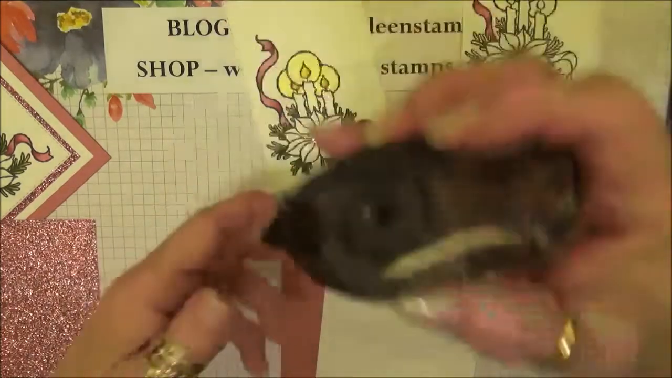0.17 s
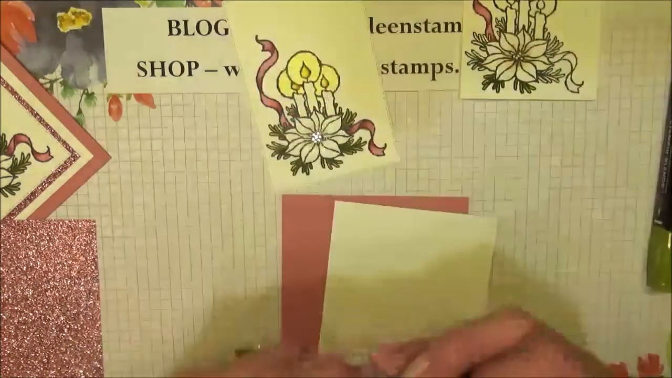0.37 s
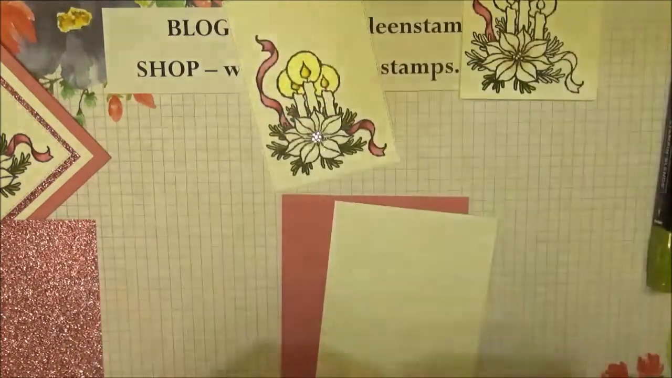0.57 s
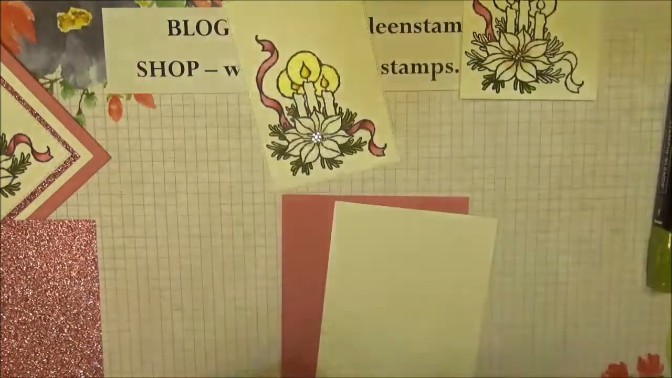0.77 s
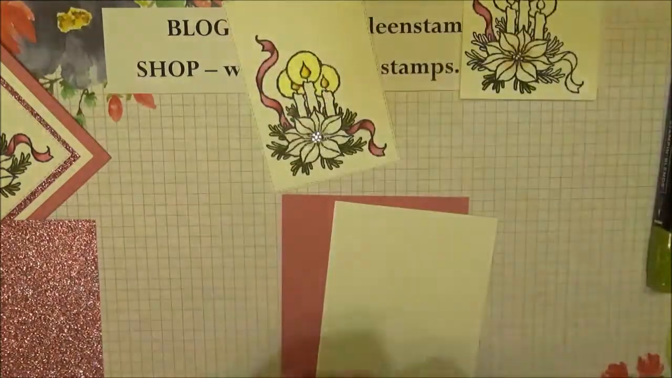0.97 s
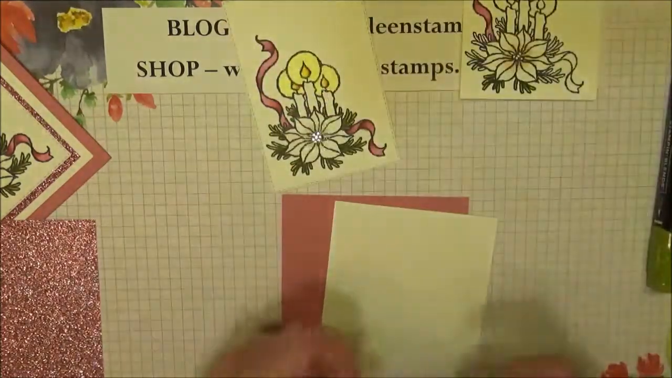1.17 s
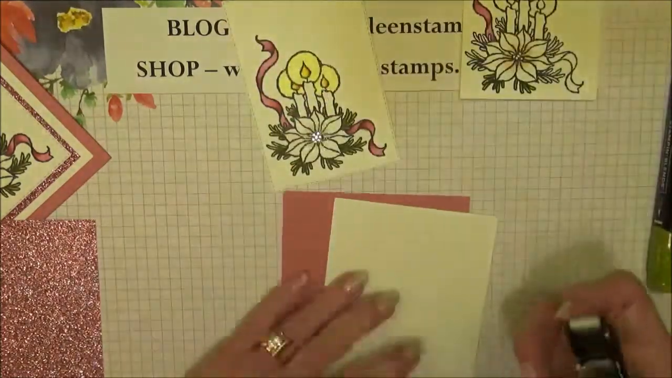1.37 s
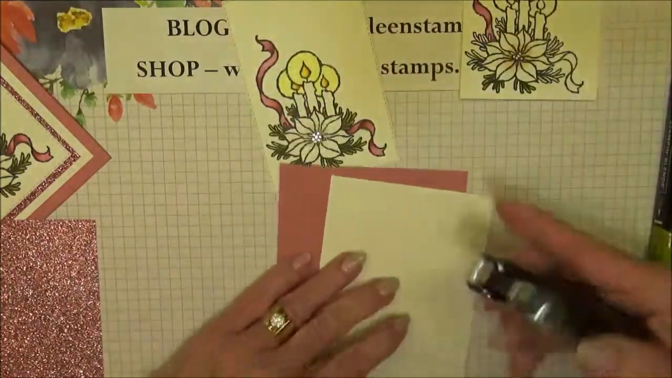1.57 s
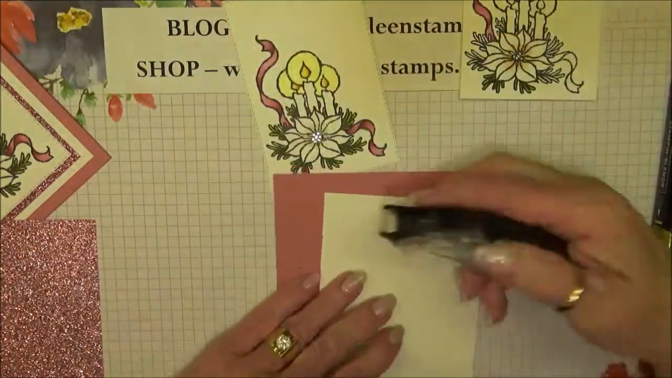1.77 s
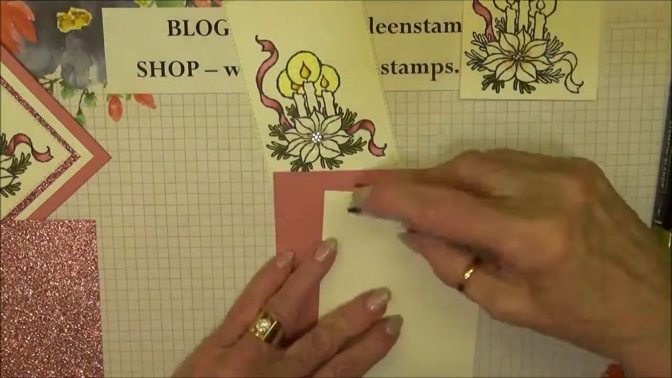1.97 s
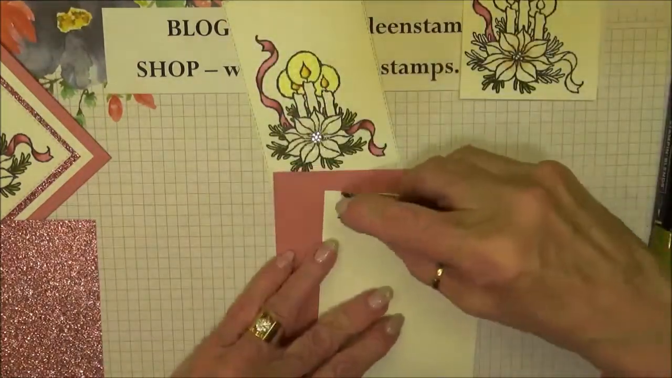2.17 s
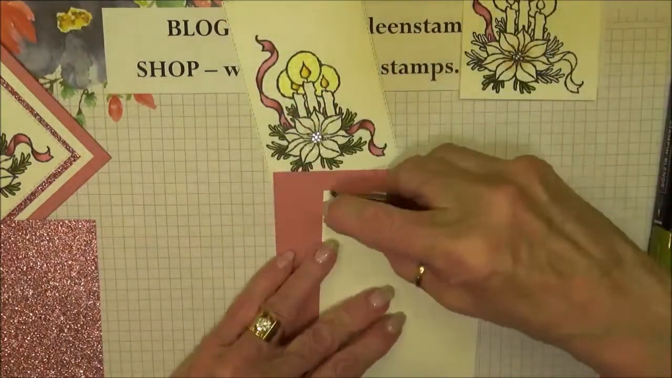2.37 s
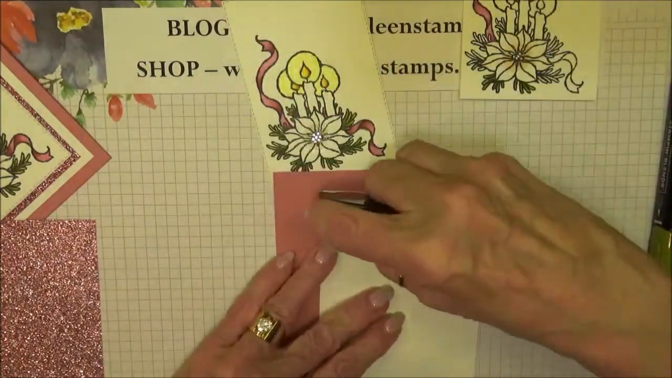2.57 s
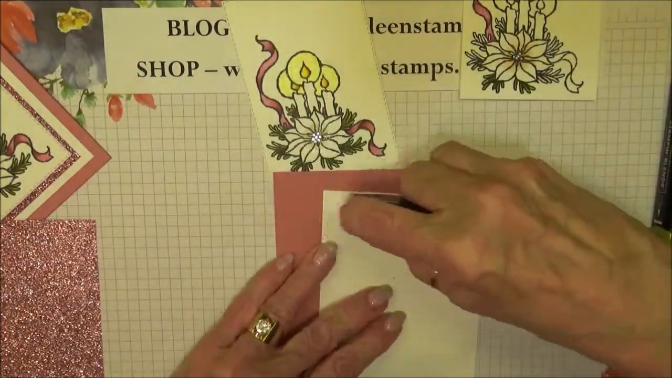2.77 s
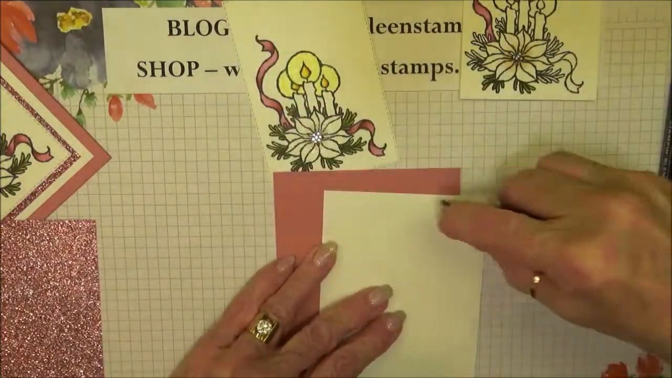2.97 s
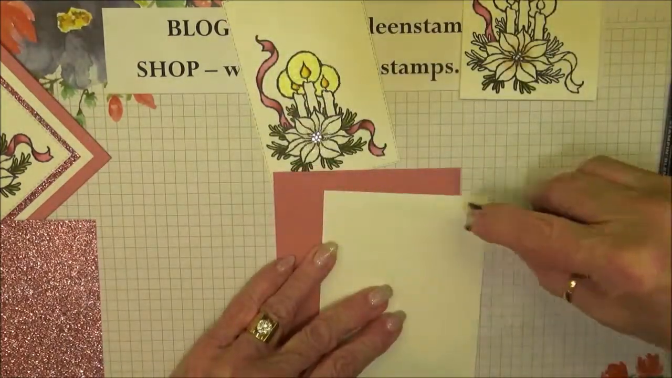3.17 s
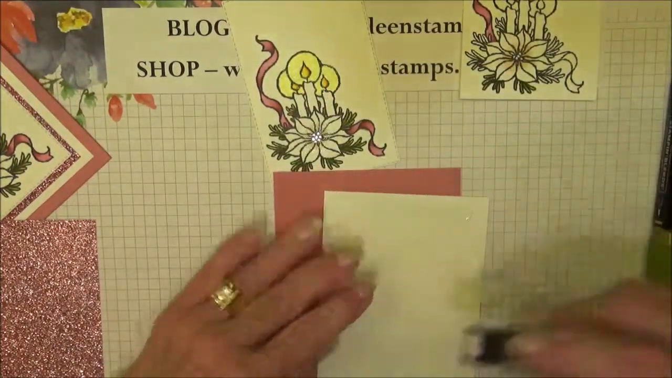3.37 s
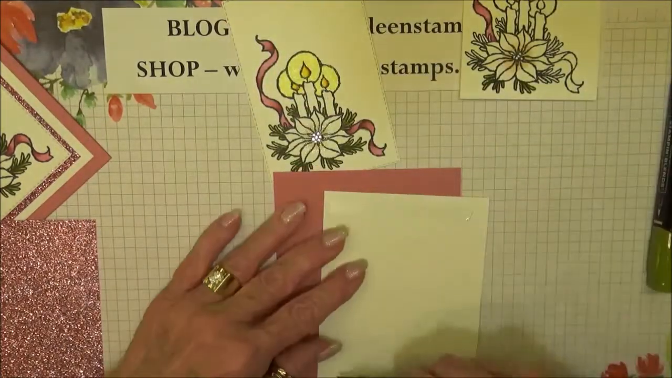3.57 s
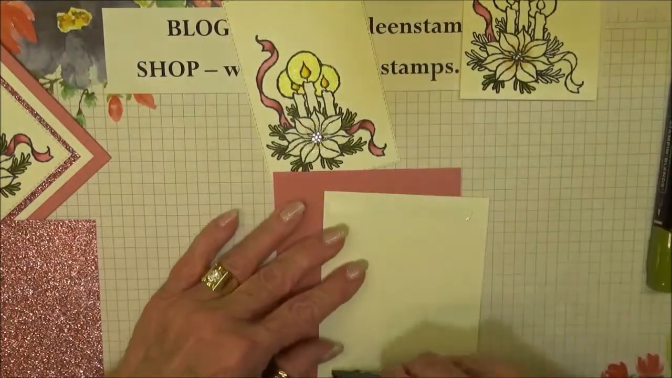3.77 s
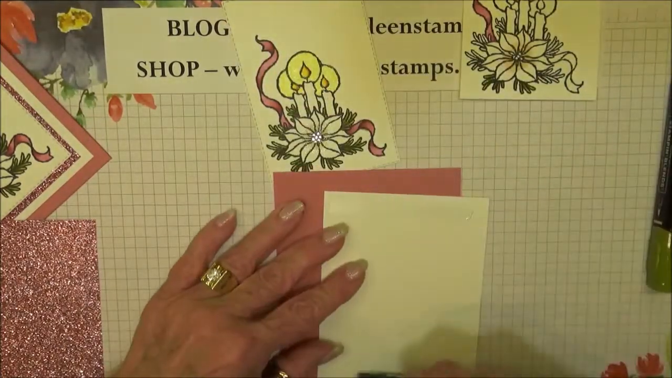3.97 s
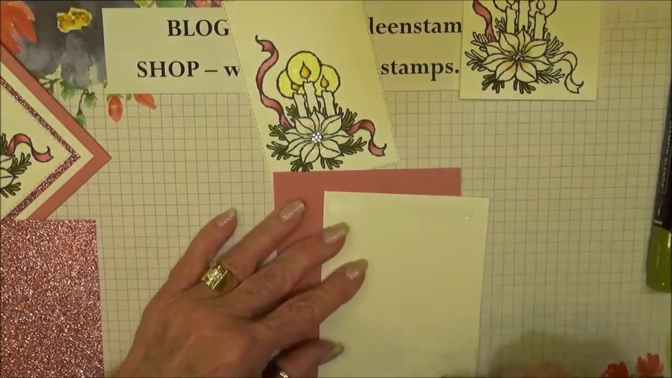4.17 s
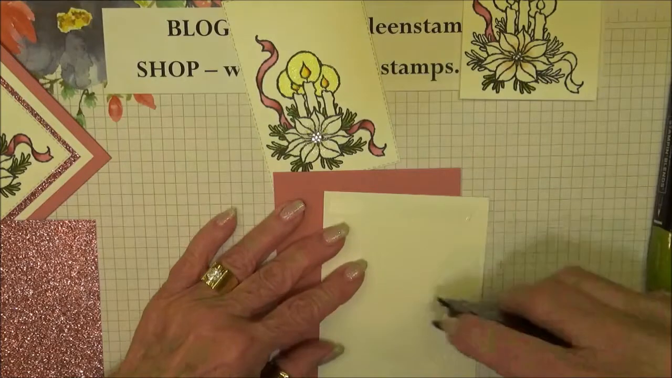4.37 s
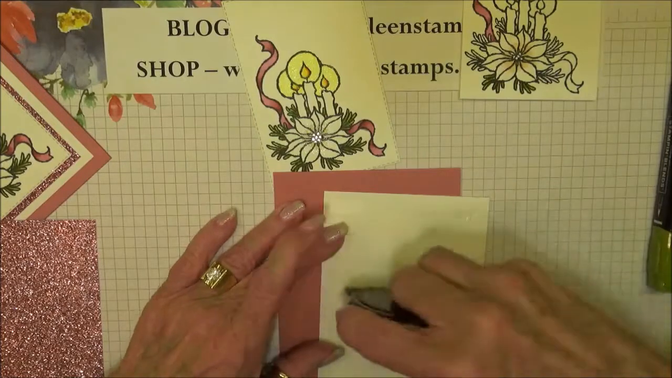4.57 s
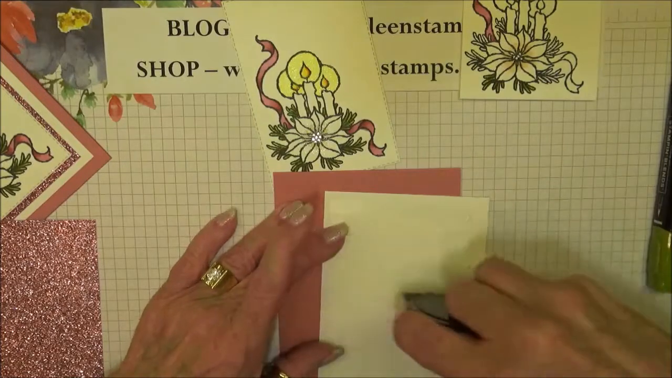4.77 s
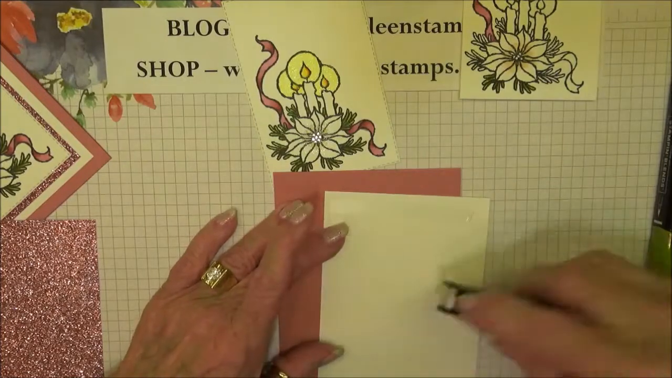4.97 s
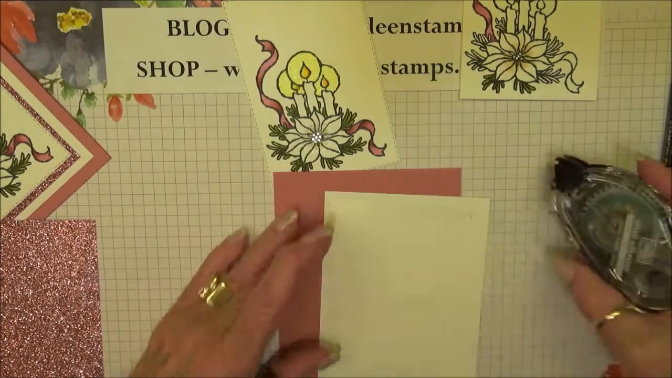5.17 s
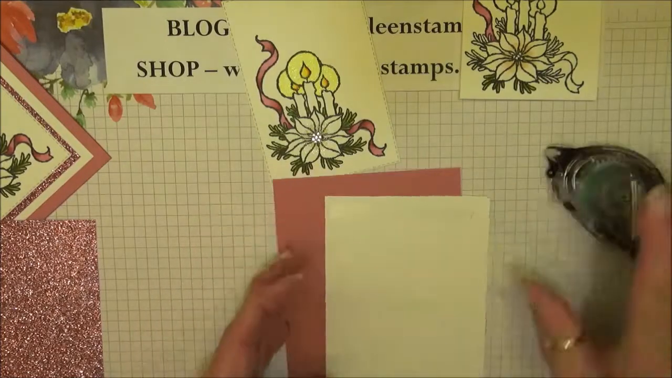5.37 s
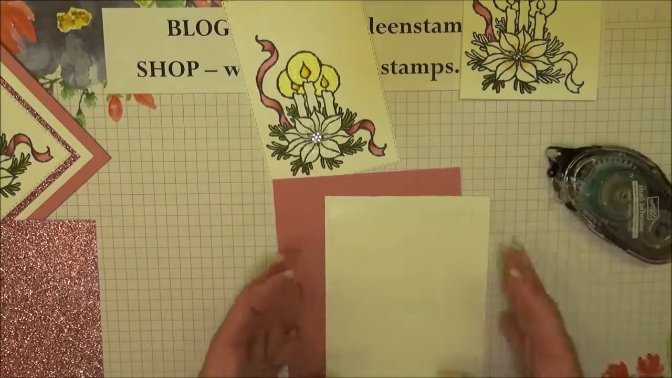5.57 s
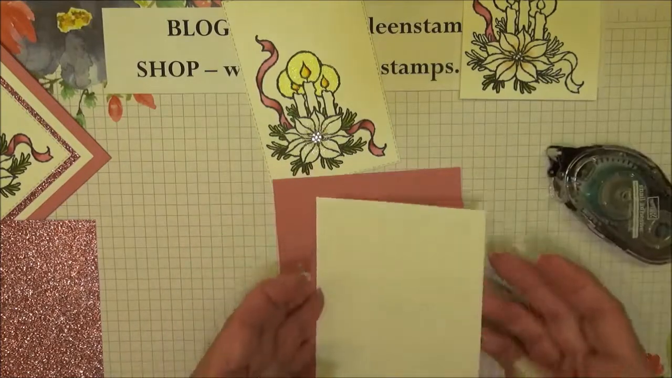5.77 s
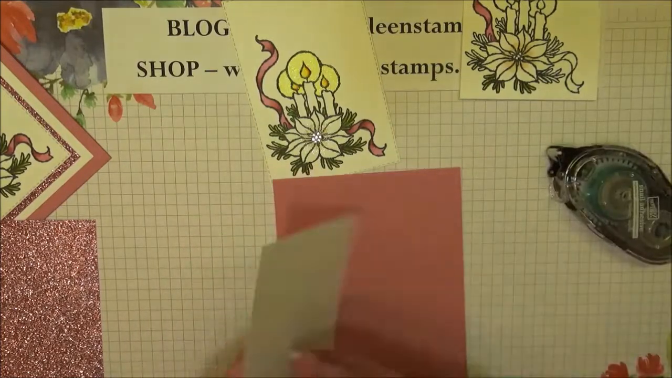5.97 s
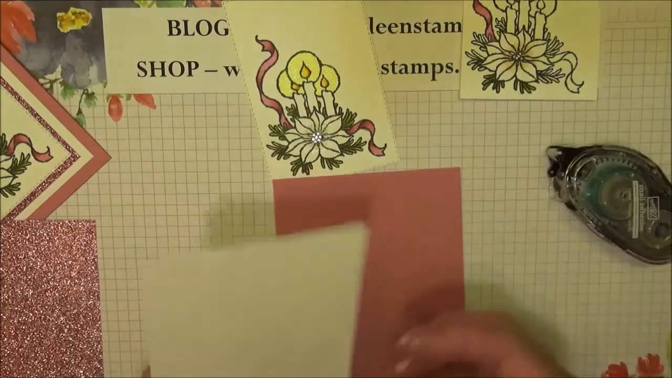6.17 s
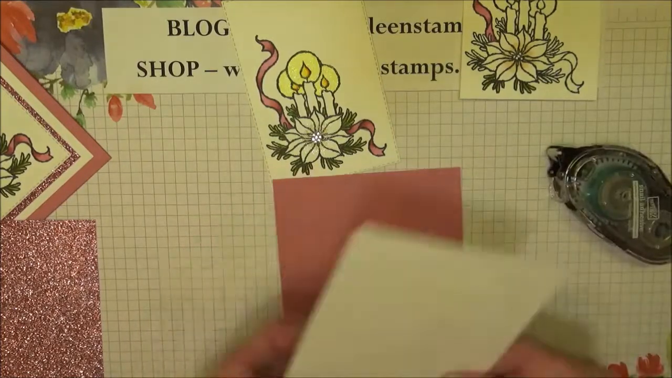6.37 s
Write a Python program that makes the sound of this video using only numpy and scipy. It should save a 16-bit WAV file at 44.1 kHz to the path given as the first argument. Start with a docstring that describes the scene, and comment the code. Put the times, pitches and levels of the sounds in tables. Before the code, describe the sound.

Light plastic clicks and card rustle, three zippy stick-slip tape pulls, then a busy clatter as the dispenser is set down and card lifted.

```python
"""Tape runner at a desk

Adhesive tape is pulled three times: stick-slip tearing crackles through the casing and rumbles in the desk.
Casing and card click as struck resonators, narrow-band noise gives a faint whistle and creaks, and
fingers rustle as grainy friction noise.
The runner is laid down with clicks and soft thuds, impacts that ring the desk top.
A short diffuse reverberation and a quiet, humming noise floor surround the hands; the treble ends steeply.
"""
import sys
import numpy as np
from scipy import signal
from scipy.fft import rfft, irfft, next_fast_len
from scipy.io import wavfile
from scipy.ndimage import uniform_filter1d, map_coordinates

SR = 44100
rng = np.random.default_rng(int(sys.argv[2]) if len(sys.argv) > 2 else 0)


def generate_wav(sig):
    """Save sig (samples, or channels by samples) to the path in sys.argv[1] as 16-bit PCM at SR."""
    pcm = np.round(np.clip(np.atleast_2d(sig).T, -1, 1) * 32767).astype(np.int16)
    wavfile.write(sys.argv[1], SR, pcm)


N = 282989

# Progress of the tape, one list per pull. Each row: time in seconds, slips let go so far, slip level in dB.
PULL_PROGRESS = [
    [(2.652, 0, -38.5), (2.666, 1, -34), (2.674, 2, -23.5), (2.724, 6, -23), (2.7524, 8, -22),
     (2.92, 27, -24), (2.965, 31, -24), (3.002, 33, -23), (3.048, 35, -21.5), (3.062, 36, -23.5),
     (3.085, 37, -25.5), (3.1324, 38, -27)],
    [(3.893, 0, -23.5), (3.905, 1, -23), (4.0547, 22, -23), (4.0656, 23, -23), (4.0878, 24, -23)],
    [(4.688, 0, -22), (4.748, 9.5, -23), (4.7704, 11, -26), (4.801, 12, -25)],
]
# Desk rumble under each pull. Each entry: level relative to the tearing force in dB.
DESK_RUMBLE_DB = [-35, -35, -36]
# Casing colour, flat on the card in the first pull. Each row: frequency in Hz, relative density in dB per Hz.
CASING_FLAT = [(260, -76), (450, -42), (508, -26), (709, -32.5), (927, -16), (1120, -18), (1230, -4.5),
               (1440, -7), (1710, 0.5), (1930, -7.5), (3820, -5.5), (5060, -8), (5710, -14), (7670, -4),
               (11000, -15.5), (14300, -30), (22000, -120)]
# Casing colour, gripped tighter in later pulls. Each row: frequency in Hz, relative density in dB per Hz.
CASING_GRIPPED = [(260, -72), (450, -33), (738, -27), (1090, -27), (1230, -12), (1540, -1.5), (2120, -15.5),
                  (2740, -7.5), (3210, -7), (3620, -12.5), (5000, -7), (6030, -11.5), (7670, -7.5),
                  (8880, -10.5), (11000, -20), (14300, -29), (22000, -120)]
TEAR_SHARE, TEAR_MOST_S = 0.44, 0.0051  # a slip tears for this share of the gap to the next, at most this long


def pulls():
    """Stick-slip: each slip tears adhesive for a few ms, driving the casing's colour and the desk's modes."""
    t = np.arange(SR // 10) / SR
    late_threads = 0.04 * amp(-60 * t / 0.4)  # threads part late

    def slip(hold):
        onset = 1 - np.exp(-t / 0.00064)
        return onset * (amp(-60 * np.maximum(t - hold, 0) / 0.024) + late_threads)

    power = np.zeros((len(PULL_PROGRESS), N))
    for track, pull in zip(power, PULL_PROGRESS):
        s, drawn, db = np.transpose(pull)
        times = np.interp(np.arange(round(drawn[-1]) + 1), drawn, s)
        holds = np.minimum(TEAR_SHARE * np.gradient(times), TEAR_MOST_S)
        for at, hold, (shift, size) in zip(times, holds, rng.standard_normal((50, 2))):
            gain = amp(np.interp(at, s, db) + 0.5 * size)
            add(track, at + 0.00045 * shift, (gain * slip(hold)) ** 2)  # powers of overlapping slips add
    force = np.sqrt(power) * patchy(crackle(spiky_db=3.0), depth_db=2)
    rumble = ringing(amp(DESK_RUMBLE_DB) @ force, desk_modes)
    first = filtered(force[0], causal(CASING_FLAT))
    later = filtered(force[1] + force[2], causal(CASING_GRIPPED))
    return first + later + rumble


# Faint narrow whistle and creaks. Each row: start in seconds, end in seconds, level in dB,
# unsteadiness in dB, ring frequency in Hz, ring width in Hz before squaring.
NARROW_RINGS = [(3.18, 3.518, -64.5, 2, 1940, 130), (3.815, 3.9, -57.5, 4, 1520, 320),
                (4.567, 4.7, -56, 7.5, 1535, 320), (4.812, 4.86, -61, 5.5, 1535, 320)]


def whistle_and_creaks():
    """Resonance of noise: narrow rings, one near 1.9 kHz and three near 1.5 kHz, sounding unsteadily."""
    level, fits = np.zeros((len(NARROW_RINGS), N)), wobble(90)
    for track, (start, end, db, unsteady_db, *_) in zip(level, NARROW_RINGS):
        add(track, start, amp(db) * signal.windows.tukey(round((end - start) * SR), 0.2))
        track *= amp(unsteady_db * fits)

    def rings(hz):
        return np.array([resonant([(*row[4:], 0)], hz) ** 2 for row in NARROW_RINGS])

    return ringing(level * crackle(spiky_db=3.5), rings).sum(axis=0)


# Clicks of casing and card. Each row: time in seconds, strength in dB, relative treble in dB,
# relative body in dB.
CLICK_EVENTS = [(0.0864, -31.5, -24, -8.5), (0.203, -39, -11, -24), (0.2555, -61.5, 14, -14),
                (0.314, -39, -10, -9), (0.318, -26, -10.5, -9.5), (0.3292, -26.5, -32, -29),
                (0.382, -32.5, -11.5, -29), (0.5187, -32, -9.5, -19.5), (0.5305, -30.5, -24, -17),
                (0.5441, -39.5, -15, -21), (0.5686, -46, -5, -18), (0.597, -50, 0, -13),
                (0.627, -48, -17, -20), (0.675, -44.5, -4.5, -32), (0.718, -45.5, 4.5, -26),
                (0.7437, -36.5, -22, -23), (0.7663, -37, 0, -19.5), (0.7876, -37, -11, -40),
                (0.8132, -46.5, 8, -20), (0.8213, -44, -4, -25), (0.896, -46.5, -8, -25),
                (0.9444, -23.5, 0.5, -22.5), (0.9994, -22, -10, -20.5), (1.055, -43, -12, -13),
                (1.1838, -27, -1, -17.5), (1.28, -44, -1, -11), (1.3349, -37, -3, -7.5),
                (1.3748, -53, 7, -17), (1.4109, -38, -2, -11), (1.4428, -39.5, 1, 0), (1.552, -45, -6, 0),
                (1.6618, -37, -18, -15.5), (1.7828, -42.5, -9, -19), (1.8062, -41, -26, -9.5),
                (1.8863, -40.5, 8.5, -2), (2.2669, -46, -8.5, -7), (2.4143, -43, -4.5, -7.5),
                (2.449, -46.5, -7, -9), (2.495, -49.5, -0.5, -9), (2.5682, -21.5, -14, -22),
                (2.585, -40.5, -3, -6.5), (3.109, -35, 3, -17), (3.116, -43, 10, -17),
                (3.1208, -36.5, 11, -34), (3.1997, -27.5, -2, -21), (3.4715, -32, -3, -5),
                (3.662, -41, -8, -9), (3.8531, -40.5, -12, -21), (4.1492, -41, 2.5, -19),
                (4.218, -39.5, -11, -23), (4.231, -31, -3, -11.5), (4.2412, -38.5, 4.5, -27),
                (4.2712, -34, -6, -19), (4.2798, -25, -13.5, -37), (4.335, -36, -15, -20),
                (4.5348, -25.5, -7, -27), (4.5461, -22, -10, -18.5), (4.8674, -31, 1, -5.5),
                (4.9147, -43.5, 8, -17), (4.9597, -40, -8, -23), (5.1671, -29, 2.5, -32),
                (5.1946, -24, -3, -11), (5.1797, -32, -10, -14), (5.2827, -18.5, -7.5, -15.5),
                (5.2904, -18, -7, -21), (5.3676, -18, -8, -15), (5.3861, -23, -9.5, -38),
                (5.397, -27, -9, -27), (5.4213, -20.5, -13, -38), (5.447, -19.5, -8.5, -15),
                (5.474, -20, -20, -16), (5.4962, -26, -5, -26), (5.6168, -30.5, -15, -21),
                (5.646, -26.5, -16, -19), (5.8011, -23, -3.5, -15), (5.8334, -33, -2, -11),
                (5.848, -32.5, -3, -15), (5.9073, -33.5, -3.5, -15), (5.9292, -32.5, -0.5, -2.5),
                (5.9442, -39, -3, -3.5), (6.068, -49, -20, 4), (6.1817, -36.5, -7.5, -11.5),
                (6.2219, -28.5, -5, -8), (6.232, -31, 1, -3.5), (6.2401, -33, 0, -7.5),
                (6.2566, -30.5, -4, -4.5)]
# Low resonances. Each row: frequency in Hz, width in Hz before broadening, relative level through
# the casing in dB, relative level through card and desk in dB.
BODY_MODES = [(532, 370, -12.5, -1), (956, 215, -5.5, -2), (1212, 98, -2.5, -5.5)]
# Upper casing resonances. Each row: frequency in Hz, width in Hz before broadening, relative level in dB.
CASING_MODES = [(2304, 1160, -4.5), (2990, 1310, -1), (4960, 1270, -4), (6200, 400, -9), (7640, 1540, -2.5),
                (8900, 1050, -3.5), (10550, 3400, -10.5)]
# Narrow rings of the casing held free in the air. Each row: frequency in Hz, width in Hz before
# broadening, relative level in dB.
SHELL_MODES = [(1770, 100, -19), (3495, 170, -12.5), (5230, 150, -13.5)]
HELD_FREE_FROM_S, HELD_FREE_TO_S = 0.45, 1.1
CARD_FROM_S = 5.44  # later clicks come through card and desk
CLICK_T60_S, LONGER_PER_DB = 0.028, 0.0258  # burst decay at -34 dB, log growth for each dB louder
FIRST_BLOW = 7.23  # first sample, against a burst of rms 1 before its decay


def clicks():
    """Impulse response: a blow and a short burst ring body, middle and treble modes at chance strengths."""
    upper, rows = [(1701, 330, 0.2)] + CASING_MODES, CLICK_EVENTS + ticks()
    modes = BODY_MODES + upper + SHELL_MODES
    t, hits = np.arange(SR // 10) / SR, np.zeros((len(modes), N))
    grit = np.pad(crackle(spiky_db=1), (0, SR))
    for (s, db, treble_db, body_db), chance in zip(rows, rng.standard_normal((len(rows), len(hits)))):
        t60 = CLICK_T60_S * np.exp(LONGER_PER_DB * (db + 34))
        burst = amp(-60 * t / t60) * grit[round(s * SR):][:len(t)]
        burst[0] = FIRST_BLOW
        levels = [body_db - 0.5 + (card_db if s > CARD_FROM_S else casing_db)
                  for _, _, casing_db, card_db in BODY_MODES]
        levels += [mode_db + (-8 if hz < 4000 else treble_db - 2.0) for hz, _, mode_db in upper]
        if HELD_FREE_FROM_S < s < HELD_FREE_TO_S:
            levels += [mode_db for _, _, mode_db in SHELL_MODES]
        for track, level_db, c in zip(hits, levels, chance):
            add(track, s, amp(db + level_db + 2.14 * c) * burst)

    def squared_modes(hz):  # squaring steepens the skirts; broader single modes make up for the narrowing
        return np.array([(-1) ** k * resonant([(centre, 1.69 * width, 0)], hz) ** 2
                         for k, (centre, width, *_) in enumerate(modes)])

    return ringing(hits, squared_modes).sum(axis=0)


TICKS_A_SECOND = 4  # faint chance ticks under sliding fingers
TICK_DB, TICK_TREBLE_DB, TICK_BODY_DB = 12, -2, -25  # strength over the steady hiss, relative colour


def ticks():
    """Random point process: click rows at chance times, their strength following the sliding."""
    s = rng.uniform(0, N / SR, int(TICKS_A_SECOND * N / SR))
    db = np.interp(s, *np.transpose(SLIDING)[:2]) + TICK_DB
    return [(at, level, TICK_TREBLE_DB, TICK_BODY_DB) for at, level in zip(s, db)]


# Knocks on the desk. Each row: time in seconds, strength in dB, relative deep thump in dB.
DESK_KNOCKS = [(1.282, -50.5, 0), (2.567, -40.5, -21), (3.129, -61, -9), (3.466, -52.5, -11),
               (4.526, -49.5, -16), (4.693, -47, -20), (5.178, -41.5, -14), (5.291, -24, -31),
               (5.37, -43, -7), (5.457, -29, -33), (5.549, -38.5, -22), (5.639, -41, -29), (5.8, -47, -24),
               (5.906, -41, -23), (6.228, -44, -23)]


def thuds():
    """Soft impact: slow-rising pushes and a shaking tail ring the desk, with a decaying deep sine below."""
    t, pushes, deep = np.arange(SR // 4) / SR, np.zeros(N), np.zeros(N)
    for (s, db, deep_db), grit in zip(DESK_KNOCKS, rng.standard_normal((len(DESK_KNOCKS), len(t)))):
        shaking = 1.1 * amp(-60 * t / 0.17) * grit
        push = (amp(-60 * t / 0.0043) + shaking) * (1 - np.exp(-t / 0.0012))
        add(pushes, s, amp(db + 7.5) * push)
        thump = amp(-60 * t / 0.18) * (1 - np.exp(-t / 0.0032)) * np.sin(2 * np.pi * 66 * t)
        add(deep, s, amp(db + deep_db + 11.0) * thump)
    return deep + amp(-11.5) * ringing(pushes, lambda hz: desk_modes(hz) / (1 + 1j * hz / 700))


# Resonances of the desk top. Each row: frequency in Hz, width in Hz, relative level in dB.
DESK_MODES = [(99, 26, 0), (201, 25.3, 4), (342, 12.6, 3), (486, 19, -15), (575, 19, -4.5)]


def desk_modes(hz):
    """Modal superposition: the desk top answers as a sum of resonances."""
    return resonant(DESK_MODES, hz)


# Steady sliding of skin and card. Each row: time in seconds, hiss level in dB, card body level in dB.
SLIDING = [(0, -59.5, -63.5), (.86, -62.5, -65.5), (1.5, -54.5, -64.5), (1.93, -55, -59.5),
           (1.98, -71, -71.5), (2.55, -69, -65.5), (3.15, -59, -56.5), (3.45, -62, -63), (3.68, -72.5, -68),
           (4.1, -57.5, -62), (4.33, -65, -57), (4.36, -70, -68.5), (4.85, -55.5, -61), (5.1, -60, -67.5),
           (5.45, -50, -45.5), (5.68, -62, -62), (5.8, -47.5, -50.5), (6.42, -61, -67)]
# Short swells of scraping, with one slip-like swell near 4.53 s. Each row: start in seconds,
# end in seconds, hiss in dB, card body in dB.
SHORT_SWELLS = [(0.043, 0.084, -61, -78), (0.408, 0.447, -60, -65), (0.491, 0.566, -56, -83),
                (0.713, 0.823, -62, -64), (0.952, 1.009, -44.5, -61), (1.312, 1.477, -48, -67),
                (2.027, 2.07, -62, -73), (4.154, 4.166, -46, -60), (4.446, 4.467, -50.5, -55.5),
                (4.53, 4.549, -40, -50.5), (5.161, 5.193, -39.5, -49), (5.49, 5.6, -50, -50.5),
                (5.779, 5.843, -42.5, -45.5), (5.892, 5.973, -46, -42.5), (5.955, 6.069, -50.5, -50),
                (6.097, 6.158, -53, -57.5), (6.26, 6.357, -49.5, -54)]
# Colour of the skin's hiss. Each row: frequency in Hz, relative density in dB per Hz.
SKIN_COLOUR = [(880, -52), (1500, -31), (2080, -6), (2390, -33), (2580, -3.5), (5650, -3), (7750, 1.5),
               (11000, -6), (14300, -21), (22000, -120)]
# Colour of the card's body. Each row: frequency in Hz, relative density in dB per Hz.
CARD_COLOUR = [(120, 2.5), (200, -3.5), (463, -8), (696, -3), (815, -5.5), (1230, -1.5), (3000, -8),
               (3900, -13), (6600, -120)]


def rustle():
    """Friction noise: sliding skin hisses in clumps of grains and the card drones under it."""
    levels = amp(curves(SLIDING))
    for start, end, hiss_db, body_db in SHORT_SWELLS:
        swell = signal.windows.tukey(round((end - start) * SR), 0.5)
        add(levels[0], start, amp(hiss_db) * swell)
        add(levels[1], start, amp(body_db) * swell)
    clumps = 1.4 * wobble(70) + 2.2 * wobble(200)  # dB

    def card_gain(hz):
        return amp(along(CARD_COLOUR, hz)) * hz ** 2 / (hz ** 2 + 130 ** 2)

    hiss = filtered(crackle(spiky_db=-1), lambda hz: amp(along(SKIN_COLOUR, hz)))
    body = filtered(crackle(spiky_db=3), card_gain)
    hiss = unit(amp(clumps) * hiss)
    body = unit(amp(0.7 * clumps + 3.45 * wobble(40)) * body)
    return levels[0] * hiss + levels[1] * body


# Reverberation. Each row: frequency in Hz, time to fall by 60 dB in seconds.
ROOM_DECAY = [(200, 0.35), (2000, 0.16), (10000, 0.12)]


def room(x):
    """Diffuse reverberation: a noise tail, in which each frequency dies at its own speed, answers x."""
    hz, t, z = signal.stft(rng.standard_normal((2, SR // 2)), SR, nperseg=256)
    decay = amp(-60 * t / along(ROOM_DECAY, hz)[:, None])
    tail = signal.istft(z * decay, SR, nperseg=256)[1]
    delayed = np.pad(x, (130, 0))[None]
    return signal.fftconvolve(delayed, tail / np.linalg.norm(tail[0]), axes=1)[:, :N]


# Room and microphone noise. Each row: frequency in Hz, relative density in dB per Hz.
AIR_COLOUR = [(12, -29), (20, 3.5), (59, -8), (124, -2), (184, -8.5), (199, -14), (346, -16.5), (652, -58),
              (969, -44), (11000, -57), (14300, -65), (22000, -120)]
# Hum lines. Each row: frequency in Hz, relative level in dB.
HUM_LINES = [(26.9, -75), (91.5, -75), (118.4, -63.5), (172.3, -76), (339.1, -80)]


def background():
    """Stationary noise floor: nearly mono coloured noise and slightly unsteady sine lines."""
    mid, side = filtered(rng.standard_normal((2, N)), lambda hz: amp(along(AIR_COLOUR, hz)))
    air = amp(-64) * unit(np.array([mid + 0.067 * side, mid - 0.2 * side]))
    t, hum = np.arange(N) / SR, np.zeros(N)
    for hz, db in HUM_LINES:
        hum += amp(db + 1.5 + 0.77 * wobble(2)) * np.sin(2 * np.pi * hz * t + 0.37 * wobble(11))
    return (air + hum) * amp([[0.45], [-0.45]])


def amp(db):
    """Logarithmic level: dB to amplitude gain."""
    return 10 ** (np.asarray(db) / 20)


def unit(x):
    """Power normalisation: x scaled to rms 1."""
    return x / np.sqrt(np.mean(x ** 2) + 1e-20)


def along(points, hz):
    """Logarithmic pitch: (Hz, value) points interpolated on a log axis."""
    f, v = np.transpose(points)
    return np.interp(np.log(hz + 1), np.log(f + 1), v)


def curves(rows):
    """Linear envelopes: one value per sample for each column after the time."""
    s, *cols = np.transpose(rows)
    return [np.interp(np.arange(N) / SR, s, c) for c in cols]


def wobble(rate):
    """Band-limited fluctuation: a smooth random curve with rate knots a second."""
    knots = rng.standard_normal(int(N * rate / SR) + 4)
    return map_coordinates(knots, [np.arange(N) * rate / SR])


def filtered(x, response):
    """Linear filtering: the spectrum of x times a complex response of frequency."""
    m = next_fast_len(N + SR // 2)
    return irfft(rfft(x, m) * response(np.fft.rfftfreq(m, 1 / SR)), m)[..., :N]


def resonant(modes, hz):
    """Damped oscillators: causal response of (Hz, width in Hz, dB) resonances of alternating sign."""
    return sum((-1) ** k * amp(db) * 1j * hz * width / (centre * centre - hz * hz + 1j * hz * width)
               for k, (centre, width, db) in enumerate(modes))


def ringing(x, response):
    """Forced resonance: white x through a response scaled to mean power 1."""
    def normalised(hz):
        h = response(hz)
        return h / np.sqrt(np.mean(abs(h) ** 2, axis=-1, keepdims=True))
    return filtered(x, normalised)


def causal(points):
    """Minimum phase: a causal response with the relative gain of (Hz, dB) points and mean power 1."""
    def response(hz):
        cepstrum = irfft(np.log(unit(amp(along(points, hz))) + 1e-6))
        cepstrum[1:len(hz) - 1] *= 2  # fold negative time onto positive
        cepstrum[len(hz):] = 0
        return np.exp(rfft(cepstrum))
    return response


def crackle(spiky_db):
    """Impulsive noise: white noise of tiny breaks of very unequal size."""
    return unit(rng.standard_normal(N) * amp(spiky_db * rng.standard_normal(N)))


def patchy(x, depth_db):
    """Time-frequency modulation: random gain in patches about one slip long and one resonance wide."""
    z = signal.stft(x, nperseg=256)[2]
    field = uniform_filter1d(rng.standard_normal(z.shape), 4, 0)  # over frequency
    field = uniform_filter1d(field, 2, 1)  # over time
    return unit(signal.istft(z * amp(depth_db * unit(field)), nperseg=256)[1][:N])


def add(track, s, shape):
    """Superposition: adds a shape to a track from time s in seconds."""
    part = track[round(s * SR):][:len(shape)]
    part += shape[:len(part)]


# Where the hands work. Each row: time in seconds, left over right level in dB.
HAND_PLACE = [(0, 2), (2.9, 1), (3.05, 3), (3.5, .8), (5, 1.5), (5.3, 3.5), (5.65, 4), (5.75, 1.3),
              (6.42, -0.5)]


def scene():
    """Level panning: thuds keep a fixed, near-central balance; all else near, rumble too, moves with the hands."""
    near = pulls() + whistle_and_creaks() + clicks() + rustle()
    side_db, = curves(HAND_PLACE)
    direct = near * amp([side_db / 2, -side_db / 2])
    knocks = thuds() * amp([[0.6], [-0.6]])
    return knocks + direct + amp(-10) * room(near) + background()


EDGE_HZ, TOP_HZ = 11040, 12355  # steep drop near the first, nothing from the second up


def record(dry):
    """Band limiting: the camera's treble drops steeply at an edge, slopes down and then ends."""
    def band(hz):
        step_db = -22 * np.clip((hz - EDGE_HZ) / 70 + 0.28, 0, 1)
        slope_db = -np.maximum(hz - EDGE_HZ, 0) / 45
        return amp(step_db + slope_db) * (hz < TOP_HZ)
    return filtered(dry, band)


dry = scene()
out = record(dry)
generate_wav(out)
```